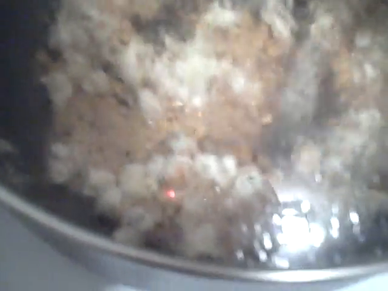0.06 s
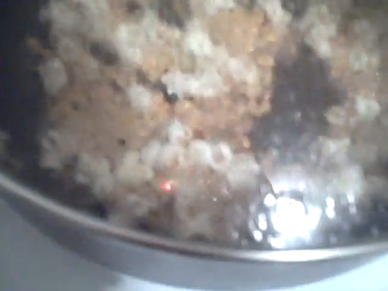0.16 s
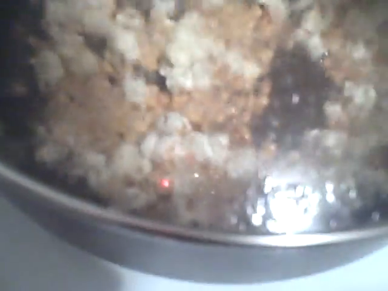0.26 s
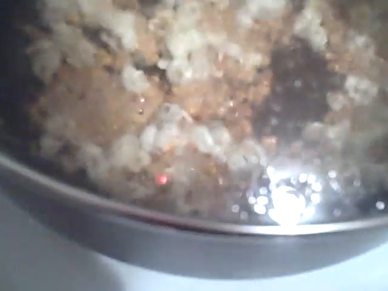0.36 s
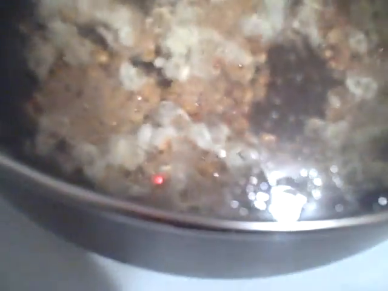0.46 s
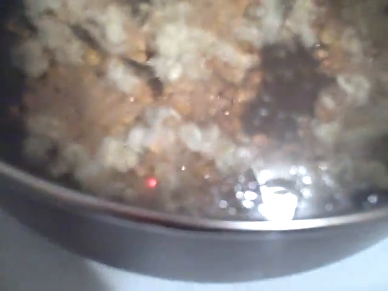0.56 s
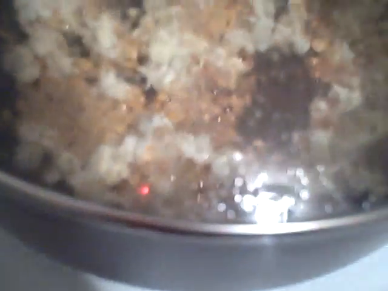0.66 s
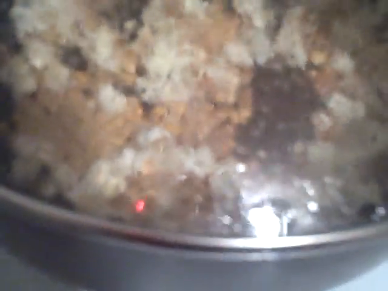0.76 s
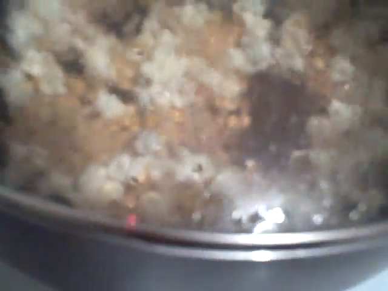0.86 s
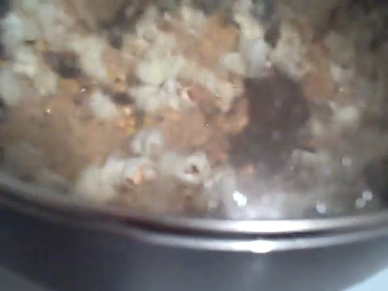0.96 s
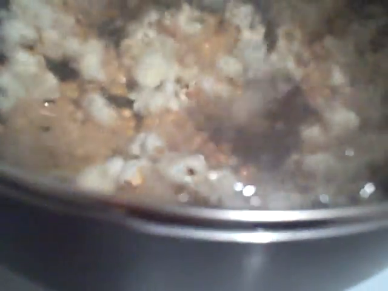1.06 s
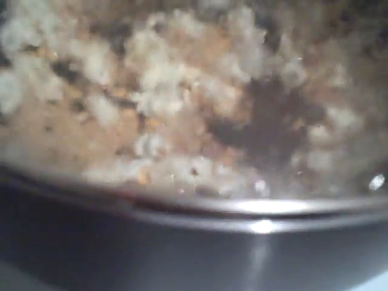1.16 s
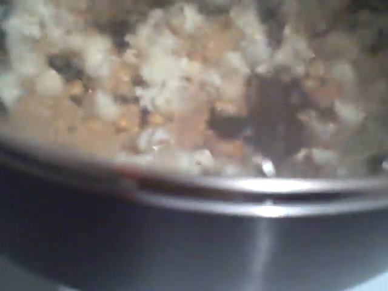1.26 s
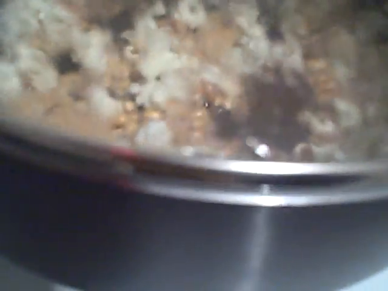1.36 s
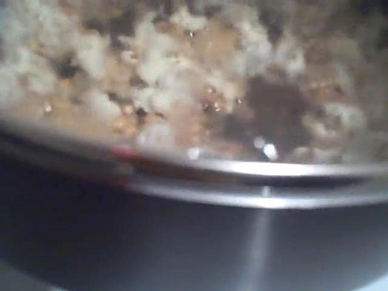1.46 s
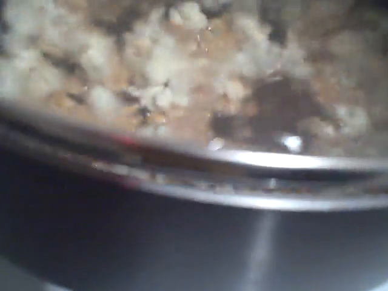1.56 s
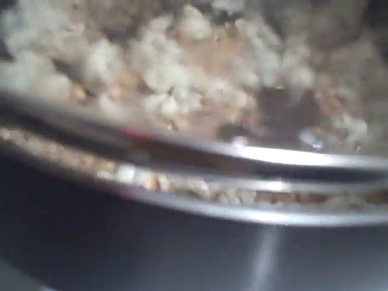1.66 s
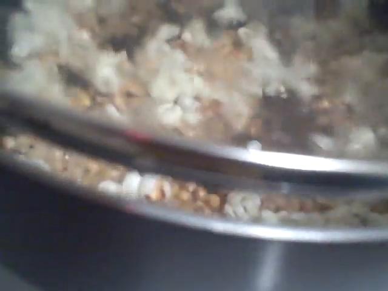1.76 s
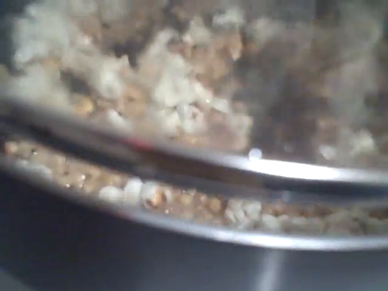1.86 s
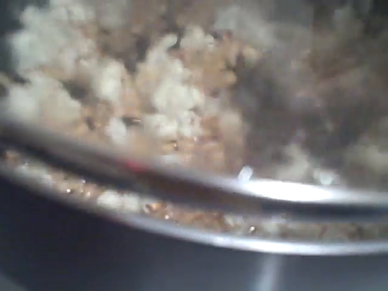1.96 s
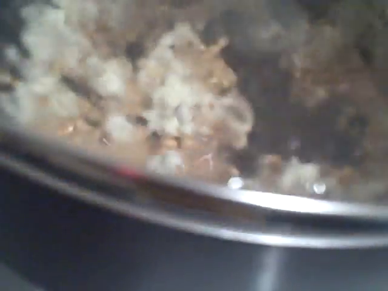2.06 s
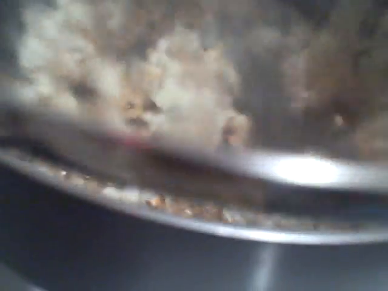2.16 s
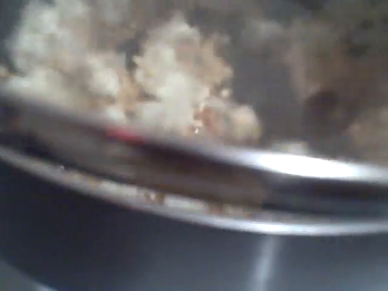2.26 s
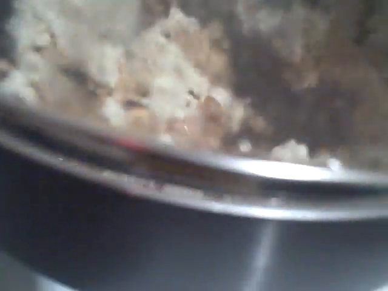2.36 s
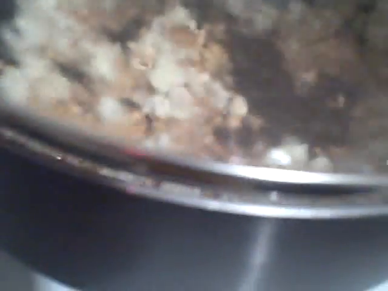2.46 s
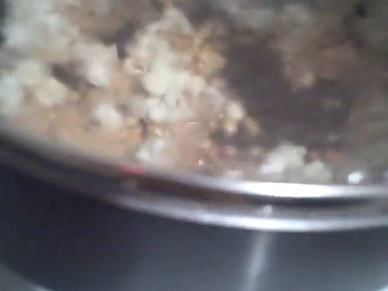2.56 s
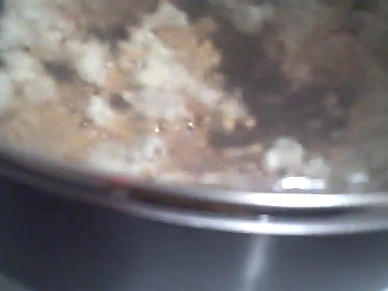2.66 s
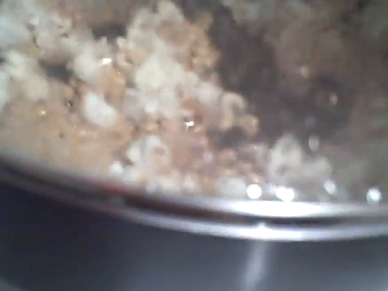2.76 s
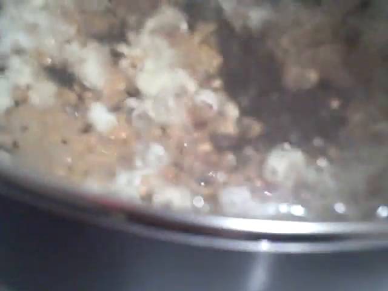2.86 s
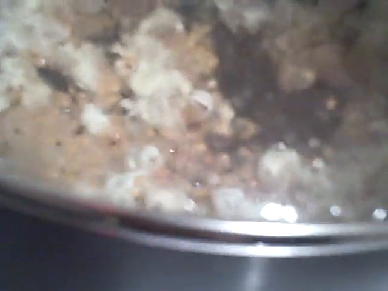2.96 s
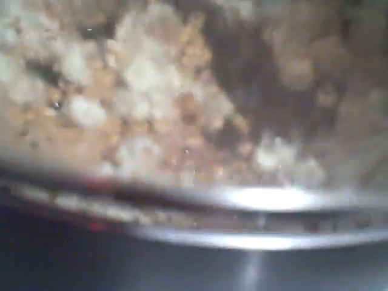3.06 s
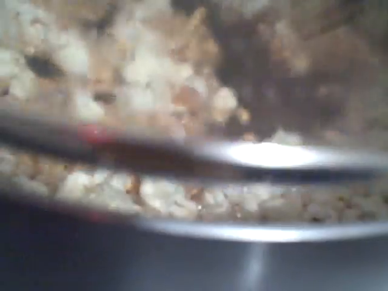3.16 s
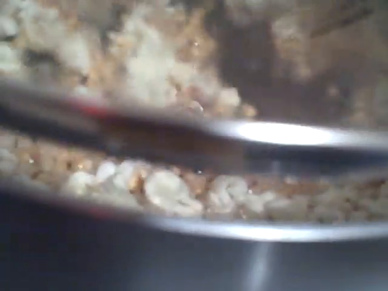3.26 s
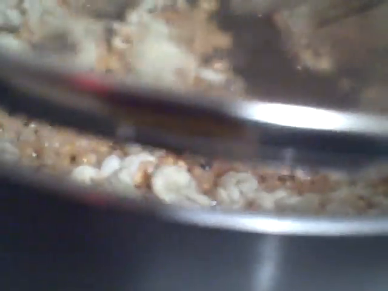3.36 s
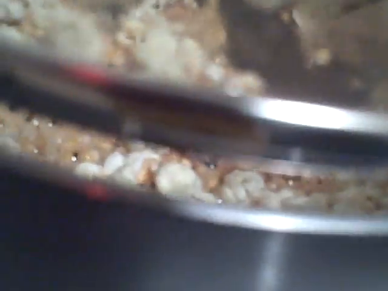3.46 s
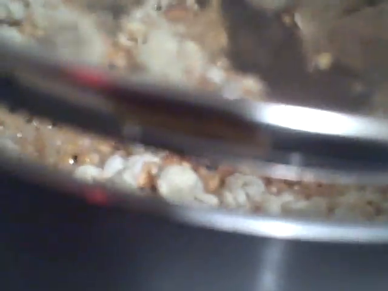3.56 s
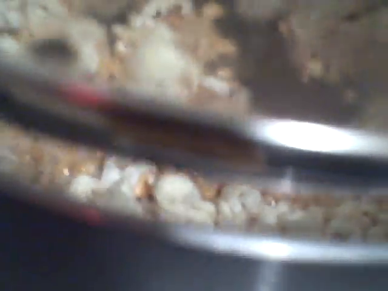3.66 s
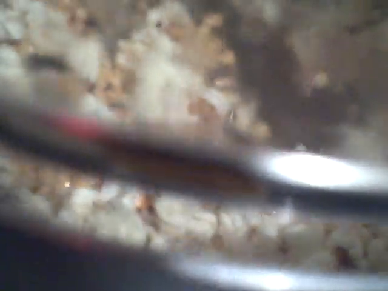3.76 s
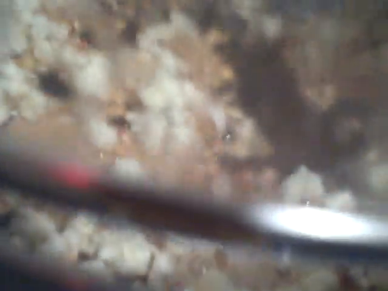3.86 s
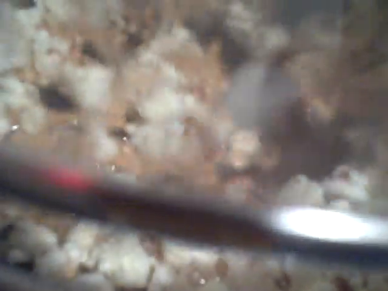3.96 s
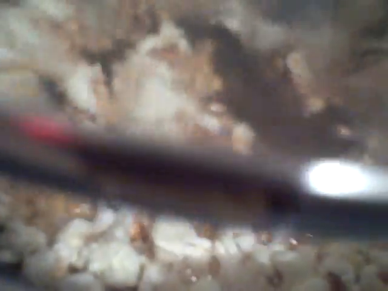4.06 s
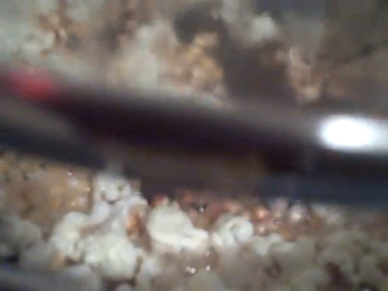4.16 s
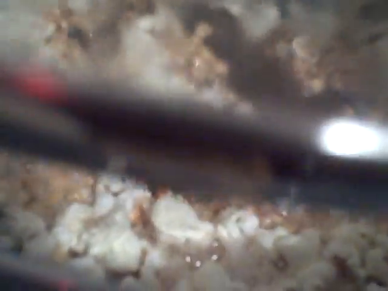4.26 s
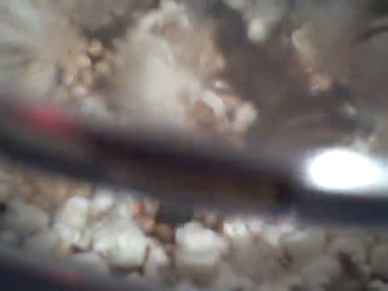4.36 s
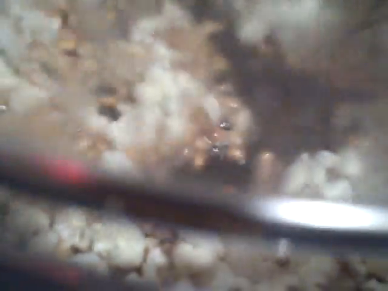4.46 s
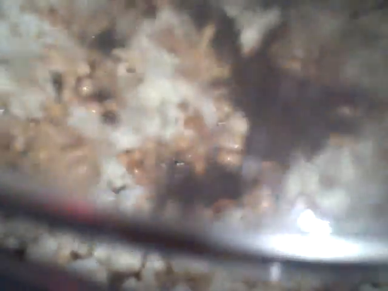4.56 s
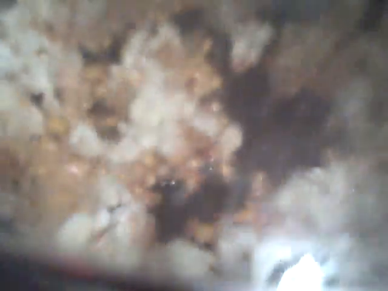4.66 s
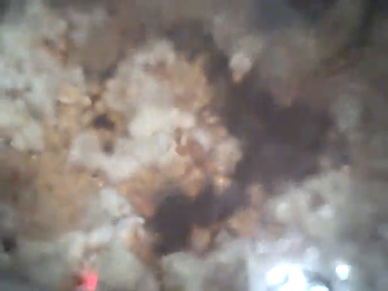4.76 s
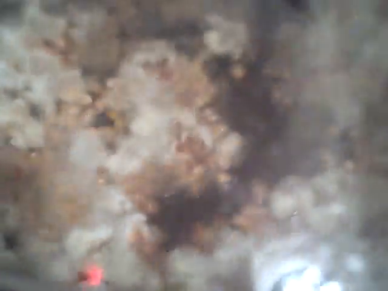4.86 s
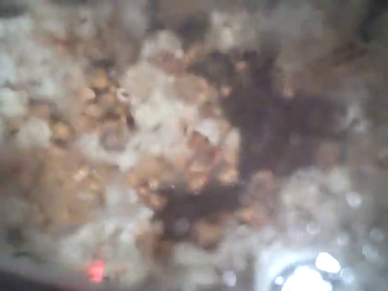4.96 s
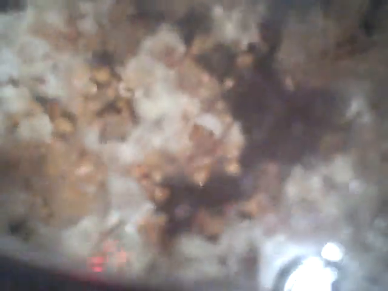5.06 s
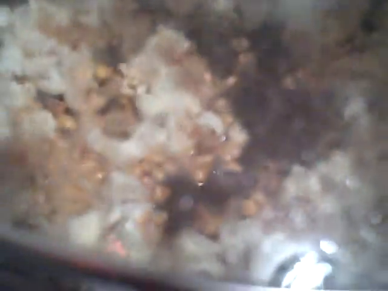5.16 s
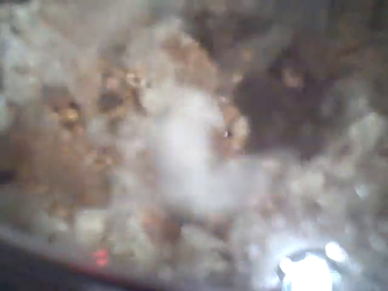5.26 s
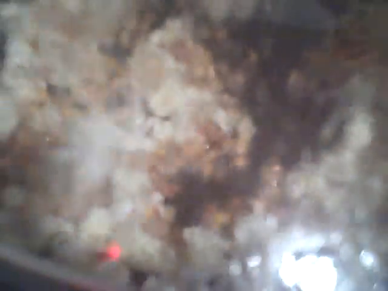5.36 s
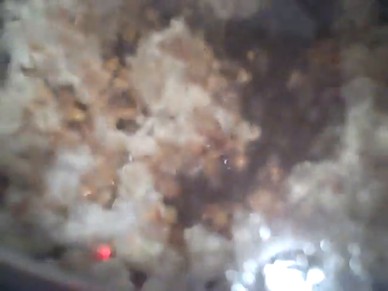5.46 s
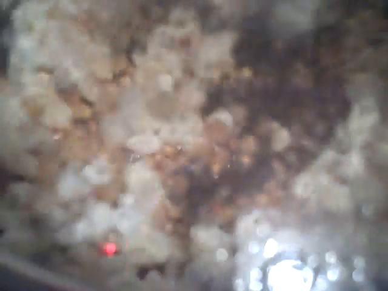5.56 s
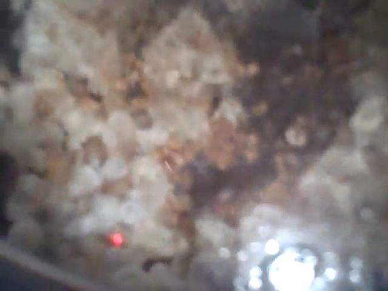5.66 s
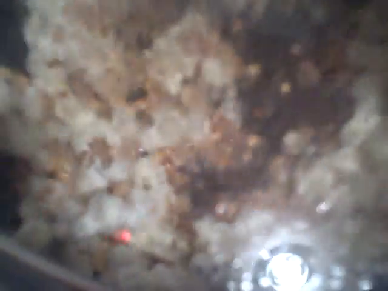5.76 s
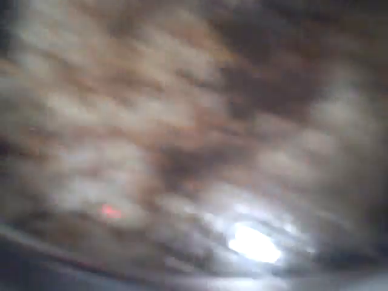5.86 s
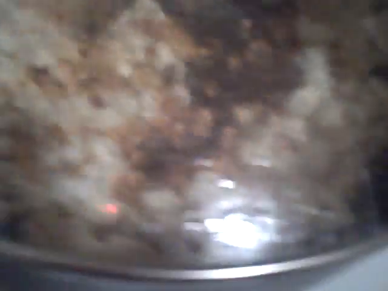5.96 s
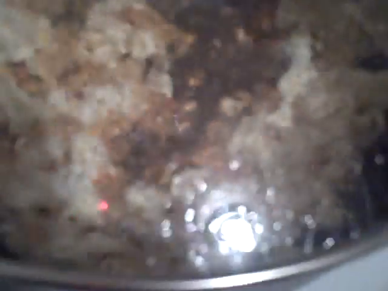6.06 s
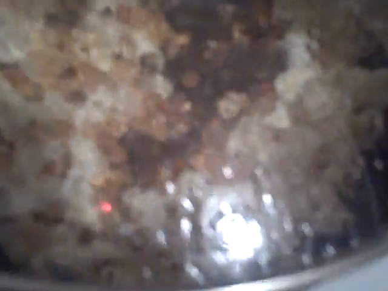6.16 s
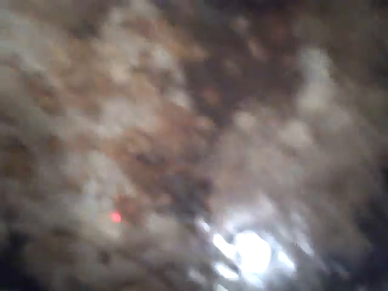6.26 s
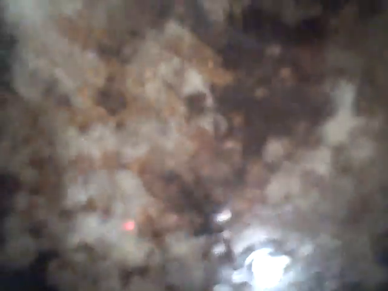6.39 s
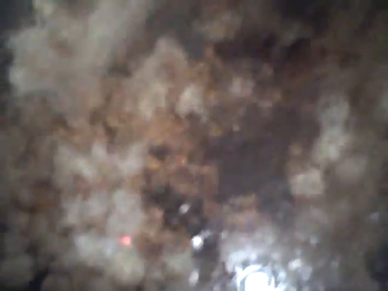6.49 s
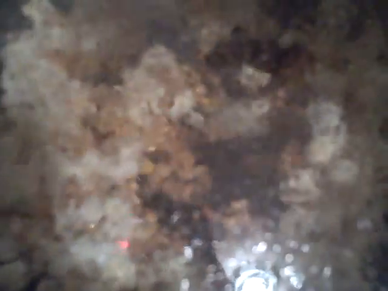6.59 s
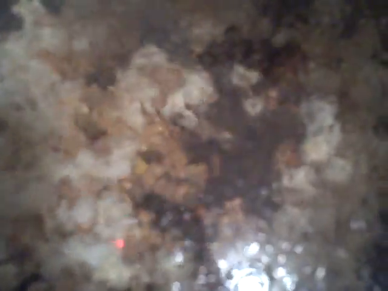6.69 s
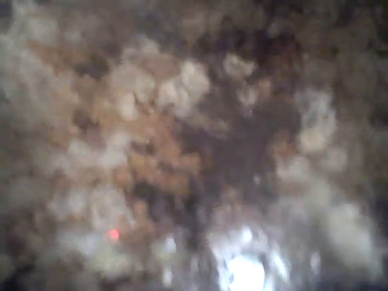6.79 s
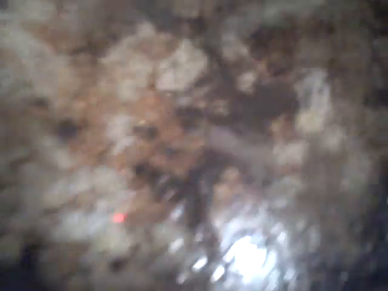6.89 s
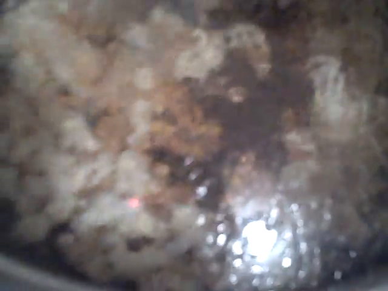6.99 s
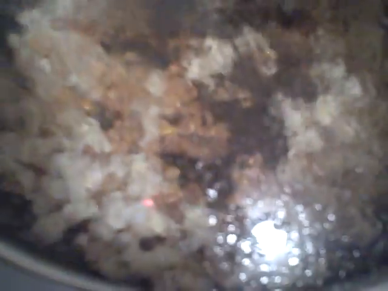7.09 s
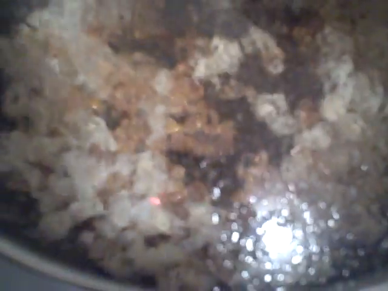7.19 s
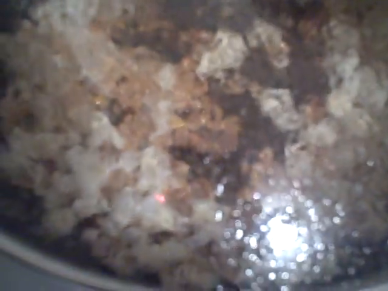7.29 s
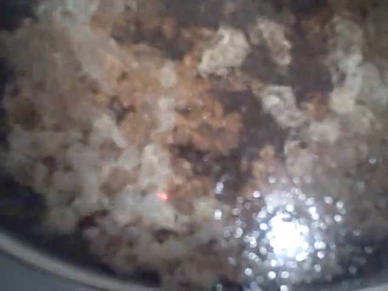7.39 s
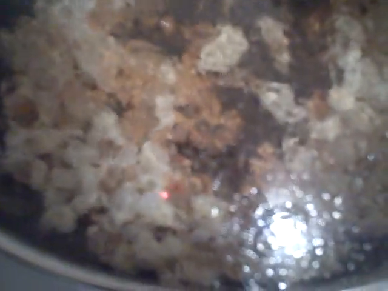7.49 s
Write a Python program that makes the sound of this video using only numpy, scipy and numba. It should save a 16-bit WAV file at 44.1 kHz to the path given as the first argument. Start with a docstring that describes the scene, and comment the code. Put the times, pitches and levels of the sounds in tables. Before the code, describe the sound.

A close microphone in a kitchen with faint hum and hiss. From 0 to 1 s, oil sizzles very quietly while kernels tick and knock, most clearly at 0.2 s. Pops start just after 1 s, crisp and metallic with a hollow thump; very loud ones strike around 1.9 and 2.3 s, leaving oil spitting. At 2.5-3 s the lid is moved: a hard clunk at 2.65, smaller knocks, low puffs of air. A lull of soft sizzle lasts until 3.7 s. Then an irregular flurry runs to 5.5 s, crowded near 4.5 and 5.4, its loudest cracks around 4.5 and 4.9 overloading slightly. From 5.5 to 5.85 s lid and pan clatter in quick knocks. A brief quiet follows, then at 6.55 s another sharp clatter and a burst of steam hiss, which flutters on with spitting oil and scattered glassy taps, notably around 7.1, until 7.5 s.

```python
"""Popcorn in a steel pan under a glass lid, close to a small camera microphone in a kitchen with a hum and short tail.
At first oil sizzles and kernels knock; from 1 s pops ring the pan's air and thump through the lid gap.
Around 2.5 s a hand moves the lid, puffing air; a second flurry runs from 3.7 to 5.5 s, the loudest pops clipping.
Then lid and kernels clatter on the rim, and from 6.5 s steam hisses; a wider gap gives thumps a higher pitch."""
import sys
import numpy as np
from scipy import signal
from scipy.fft import rfft, irfft
from scipy.io import wavfile
from scipy.ndimage import uniform_filter1d
from numba import njit

SR = 44100
rng = np.random.default_rng(int(sys.argv[2]) if len(sys.argv) > 2 else 0)


def log_audio(samples):
    """Write samples as a 16-bit WAV file to the path given in sys.argv[1]."""
    # one column per channel
    frames = np.atleast_2d(samples).T
    # limit to full scale, then quantise
    limited = np.clip(frames, -1, 1)
    pcm = np.round(limited * 32767).astype(np.int16)
    wavfile.write(sys.argv[1], SR, pcm)


N = 332071

# room hum and microphone hiss, relative colour: (frequency [Hz], density [dB per Hz])
HUM_COLOUR = [(12, -32.5), (20, 10), (252, -1.5), (505, -17), (1010, -32.5), (1200, -6), (1630, -22.5),
              (5230, -23.5), (6190, -23), (7950, -32.5), (15500, -33.5)]
HUM_DB = -56.5  # rms before its slow wavering
# oil heard through the gap, before splashes: (time [s], sizzle level [dB], spit level [dB])
OIL_LEVELS = [(0, -60.5, -70), (.27, -66, -62), (.55, -69, -65.5), (1.1, -65.5, -62), (1.76, -61, -62),
              (1.9, -52, -51.5), (2.45, -50, -45.5), (2.65, -58, -57), (2.85, -58.5, -65), (3.12, -67, -65),
              (3.3, -57.5, -54.5), (3.77, -57, -57.5), (4.3, -56, -50), (4.9, -59, -54), (5.47, -52, -45.5),
              (5.8, -65, -62.5), (6.46, -70, -67), (6.6, -43.5, -44), (6.8, -59.5, -55), (7.2, -57, -51),
              (7.53, -61, -52)]
# spitting droplets: (lowest [Hz], highest [Hz], rate [droplets per s], level in the spit [dB])
SPIT_BANDS = [(4700, 6000, 27, -6.5), (6260, 7200, 160, -6.5), (7000, 9700, 130, -6.5),
              (8500, 11000, 90, -8.5), (10300, 21000, 60, -11)]
# shakes of the pan that tumble the kernels: (time [s], level [dB], held [s])
PAN_SHAKES = [(.27, -52, 0.022), (1.22, -57, .05), (1.89, -54, .5), (2.53, -50, .03), (2.63, -41, .07),
              (2.85, -43, .07), (2.99, -43, .05), (5.05, -59, .02), (5.29, -41, .12), (5.54, -34, .03),
              (5.68, -33, .03), (6.03, -56, .03), (6.16, -54, .04), (6.57, -35.5, .07), (7.1, -51, .1)]
SHAKE_RISE_DB_PER_S, SHAKE_FALL_DB_PER_S, RESTING_DB = 700, 210, -69
TUMBLES_PER_S = 450
SCRAPE_DB = -3  # the pan's foot on the hob, relative to the rattle
# the lid gap as the neck of a bottle, higher when wider: (time [s], resonance [Hz])
GAP_PITCH = [(0, 248), (.9, 250), (1.05, 212), (1.55, 203), (1.85, 293), (2.1, 317.4), (2.2, 244),
             (2.33, 398), (2.5, 304.5), (2.6, 290), (2.64, 217.5), (2.83, 320), (2.92, 237.5), (3.1, 235),
             (3.3, 302.4), (3.8, 303), (4.33, 372), (5.27, 356), (5.54, 294.6), (5.63, 195), (6.4, 210.2),
             (6.56, 265), (7.53, 249.6)]
GAP_T60_S = 0.046
# the gap murmurs louder the wider it is
BREATH_DB, BREATH_DB_PER_HZ, CLOSED_HZ = -70, 0.0696, 240
# jerks of the lid that puff air through the gap: (time [s], level [dB], held [s])
LID_PUFFS = [(2.11, -46, .1), (2.25, -44, .04), (2.35, -43, .08), (2.53, -30, .045), (2.66, -38, .03),
             (2.84, -34, .06), (3.0, -45, .05), (3.36, -46, .02), (4.33, -43.5, .05), (5.1, -43, .03),
             (5.3, -40, .04), (5.47, -34, .05), (5.54, -29, .02), (6.17, -41, .04), (6.57, -52, .05)]
PUFF_RISE_DB_PER_S, PUFF_FALL_DB_PER_S = 1100, 300
# steam under the closed lid: (time [s], level of the hiss before flutter [dB])
STEAM_LEVELS = [(0, -75), (.9, -71), (6.45, -75), (6.55, -51), (6.85, -59), (7.05, -58), (7.2, -50),
                (7.32, -55), (7.4, -51), (7.53, -55)]
# blows after which one mode of lid or wall sings on: (time [s], frequency [Hz], starting peak [dB], t60 [s])
SINGING_MODES = [(.02, 2050, -60, 0.69), (.28, 4870, -47, 0.19), (1.057, 1108, -34.5, 0.17),
                 (4.311, 1210, -47, 0.23), (1.974, 1360, -32.5, 0.25), (2.243, 4870, -18.5, 0.03),
                 (2.644, 1113, -16.5, 0.1), (2.644, 1956, -32, 0.18), (2.918, 1402, -36.5, 0.22),
                 (4.919, 807, -41, 0.53), (4.946, 4770, -25, 0.1), (5.046, 796, -40, 0.42),
                 (5.31, 812, -40, .3), (5.31, 1394, -38, .25), (5.40, 1140, -24, .12), (2.66, 812, -40, .5),
                 (5.046, 1391, -32.5, 0.36), (5.046, 1985, -22.5, 0.053), (5.289, 4660, -31, 0.042),
                 (5.459, 1256, -30.5, 0.2), (5.528, 1410, -36, 0.37), (5.749, 3266, -44, 0.13),
                 (5.749, 3970, -21.5, 0.046)]
# glass lid on the steel rim: (frequency [Hz], weight before scatter [dB], t60 [s])
LID_MODES = [(1100, -4, .035), (1394, -8, .05), (1700, -6, .025), (2060, -5, .03), (2400, -4, .025),
             (2780, -6, .025), (3250, -3, .025), (3900, -3, .03), (4780, -3, .03), (5240, -2, .025),
             (5750, -3, .025), (6800, -8, .025), (7950, -10, .025)]
# lid, rim and loose kernels knocking, rms of the first 10 ms:
# (time [s], ring level [dB], gap thump level [dB], brightness [dB], burst t60 [s])
KNOCKS = [(.0555, -54.5, -66, -1, .04), (.1017, -56, -61, 7, .031), (.2084, -31, -48, 9.5, 0.06),
          (.2571, -43, -51, -18, .06), (.2685, -41.5, -49, -14, 0.029), (.2806, -34.5, -58, 12.5, 0.028),
          (.3717, -54, -65, -14, 0.03), (.421, -54.5, -69, 0, .032), (.6335, -53.5, -65, 20, 0.05),
          (.77, -52, -59, 0, .09), (.7868, -53, -45, 1, .09), (2.5221, -42.5, -44, -6, 0.11),
          (2.644, -19.5, -15.5, 1.5, 0.02), (2.6579, -24, -33, -8, 0.086),
          (2.8316, -26.5, -21, -1.5, 0.033), (2.8545, -42, -32, 5, 0.043), (2.8899, -46, -38, -1, .04),
          (2.9181, -41.5, -33.5, -7, 0.035), (2.9349, -44.5, -40, -18, .054), (3.0001, -37, -37, 1, .042),
          (3.0152, -42.5, -32, -12, .05), (3.0327, -47, -39, -17, .044), (5.5288, -23, -26.5, -17, 0.033),
          (5.5805, -46, -49, 10, .035), (5.6339, -29.5, -26.5, -2, 0.06), (5.669, -23, -26.5, -21, 0.027),
          (5.6831, -28.5, -39, -8, 0.06), (5.6991, -39, -34, -16, .035), (5.715, -44, -40, 0, .04),
          (5.7488, -28, -40, 2, 0.026), (5.8042, -51, -58, 14, .047), (5.8387, -47, -59, 18, .035),
          (6.0204, -50.5, -39.5, -4, 0.082), (6.1499, -37.5, -34.5, -5.5, 0.065),
          (6.4072, -39, -65, 6.5, .041), (6.4274, -43.5, -60, -4, .11), (6.4623, -44, -65, -9.5, 0.065),
          (6.5124, -58, -65, 18, .035), (6.5613, -24, -38, 7, 0.057), (6.5794, -36, -43, -8, 0.043),
          (6.595, -37, -36, -14, .049), (6.6116, -39, -30, -17, .028), (6.6237, -17, -44, -3, .02),
          (6.7534, -43.5, -53.5, 10, 0.057), (6.804, -52, -67, 25, .026), (6.8877, -40, -55, 8, .054),
          (6.9321, -43, -47.5, 11, 0.09), (6.9701, -39, -64, -0.5, 0.025), (7.0116, -52, -59, 19, .035),
          (7.0879, -29, -46, 2, .097), (7.1411, -26, -45, 10, 0.022), (7.155, -34, -53, -9, 0.056),
          (7.1861, -41, -56, 0, .049), (7.3708, -45, -68, 12, 0.043)]
# every blow: low ring and crack lie under the ring and tilt apart with the brightness
LOW_RING_DB, CRACK_DB = -3.5, -4
BLOW_SAMPLES, RING_SAMPLES = 7000, 2600
# air in the pan: (frequency [Hz], weight before scatter [dB], t60 [s])
PAN_MODES = [(1135, -5, .05), (1800, -1, .055), (2165, -2, .05), (2240, -6, .035), (2430, -10, .03),
             (2630, -8, .03), (2895, -1, .033), (3200, -6, .022), (3450, -3, .025), (3700, -6, .025),
             (4190, -3, .025), (4400, -3, .025), (4825, -2, .03), (5310, -4, .025), (5700, -4, .025),
             (6430, -9, .025), (7300, -11, .025), (7950, -11, .025)]
# faint kernels ticking at random times
TICKS_PER_S, TICK_DB, TICK_SCATTER_DB, TICK_BURST_S = 2.5, -56, 2.5, .035
# kernels bursting and striking inside the pan, rms of the first 10 ms:
# (time [s], ring level [dB], gap thump level [dB], brightness [dB], burst t60 [s])
KERNEL_POPS = [(1.047, -41, -33, 0, 0.054), (1.0568, -25, -32.5, 2, 0.029), (1.114, -51, -61, 0, .04),
               (1.2086, -23.5, -28, -0.5, 0.082), (1.27, -47, -51, 4, .04), (1.3707, -55, -65, -19, .05),
               (1.3982, -35.5, -44.5, 1.5, 0.057), (1.5313, -70, -41, -9, .035),
               (1.8526, -12.5, -21.5, 2.5, 0.049), (1.8636, -35.5, -37, 8, .03),
               (1.9003, -37, -50, 10, .03), (1.9341, -8.5, -10.5, 5, 0.048), (1.9743, -27.5, -42, -7, .04),
               (2.0395, -43, -53, -11, .035), (2.085, -47, -54, 17, .03), (2.0996, -20, -10, 0.5, 0.033),
               (2.1426, -23.5, -30.5, 5.5, .065), (2.2163, -34.5, -27.5, -1, 0.063),
               (2.2429, -30, -26, -1, 0.027), (2.3034, -43, -51, 4.5, .035),
               (2.3352, -6.5, -23.5, 7, 0.036), (2.3402, -27, -40.5, 15.5, .026),
               (2.3713, -36, -54.5, -3.5, 0.032), (2.4658, -44, -34.5, -1, .035),
               (3.2852, -49.5, -70, 10, .035), (3.4215, -51.5, -70, 13, .035), (3.7301, -45, -58, 8, 0.025),
               (3.8004, -24.5, -31.5, -3.5, 0.039), (3.831, -35, -38, -4, 0.032),
               (3.8763, -43.5, -45.5, -10, 0.031), (3.9804, -23, -30, 6, .016),
               (4.087, -11, -24.5, -6, 0.019), (4.2112, -44.5, -50, 18.5, 0.019),
               (4.31, -51, -47, -12, .05), (4.3407, -29, -39, 2.5, .035), (4.3494, -22, -28.5, -9, 0.031),
               (4.3997, -20.5, -27.5, 4.5, 0.023), (4.4225, -19, -39, 2, 0.022),
               (4.4539, -48, -50.5, -9, .035), (4.4785, -12.5, -5.5, -2, .02), (4.5, -37, -34.5, 4, .031),
               (4.5158, -45, -34, -1, .038), (4.5522, -16, -12, 0, .042), (4.5595, -21, -34, 20, .06),
               (4.5779, -24, -37, -10, 0.032), (4.704, -52, -55, 16, .035), (4.713, -49, -58, 23.5, 0.032),
               (4.733, -51, -61, 25.5, .035), (4.815, -55, -70, 23, .04), (4.9059, -15, -9, 6, 0.029),
               (4.9195, -8.5, -28.5, 4, .036), (4.9462, -27, -41.5, 10, 0.022),
               (5.0337, -31, -49, -14, .03), (5.0454, -25, -55, -12, 0.034),
               (5.0734, -17.5, -21, -8, 0.044), (5.1193, -33, -36.5, 6, .015),
               (5.158, -48.5, -37, -2, .035), (5.252, -52, -58, 11, .03), (5.2692, -20.5, -16, 0, 0.044),
               (5.3095, -27, -31.5, -13, 0.013), (5.3511, -14.5, -15.5, 2, 0.024),
               (5.386, -26.5, -35, -3, .056), (5.4009, -25, -22, 0, .022), (5.4062, -16.5, -50, -2, 0.04),
               (5.4168, -26.5, -47, 15, 0.028), (5.437, -22, -38, 6.5, .017), (5.4787, -28.5, -56, 14, .04)]
# each pop splashes oil, which sizzles up and dies away; level relative to the pop's ring
SPLASH_DB, SPLASH_T60_S = -34, .45
ROOM_T60_S, ROOM_TREBLE_T60_S, ROOM_DB = 0.34, 0.21, -20.5
TOP_HZ = 15650  # upper limit of the recorder


def undb(db):
    """Decibels to gain."""
    return 10 ** (np.asarray(db) / 20)


def level(x, db):
    """Scale to an rms level."""
    return x * undb(db) / np.sqrt(np.mean(x ** 2))


def unit(x, span=SR // 100):
    """Scale each row to unit rms over its first samples, 10 ms by default."""
    return x / np.std(x[:, :span], axis=1, keepdims=True)


def fade(t, t60):
    """Exponential decay by 60 dB in t60."""
    return np.exp(-np.log(1000) * t / t60)


def band(x, lo_hz, hi_hz):
    """Fixed band-pass."""
    return signal.sosfilt(signal.butter(2, [lo_hz, hi_hz], "band", fs=SR, output="sos"), x)


@njit
def moving_band(x, hz, width):
    """State-variable band-pass whose centre moves, gain 1 at the centre."""
    y, b, l = np.empty(len(x)), 0., 0.
    for i in range(len(x)):
        g, k = np.tan(np.pi * hz[i] / SR), width / hz[i]
        v = (b + g * (x[i] - l)) / (1 + g * (g + k))
        b, l, y[i] = 2 * v - b, l + 2 * g * v, k * v
    return y


def curve(table):
    """The columns of a table, one value a sample."""
    s, *columns = np.transpose(table)
    return [np.interp(np.arange(N) / SR, s, c) for c in columns]


def walk(rate):
    """Random levels held 1 / rate s and slewed twice; spread near 1."""
    k = int(SR / rate)
    steps = np.repeat(rng.standard_normal(N // k + 1), k)
    return 1.3 * uniform_filter1d(uniform_filter1d(steps, k), k)[:N]


def bumps(rows, rise_db, fall_db, rest_db):
    """Level in dB: each row rises from rest, holds and falls back."""
    t = np.arange(N) / SR
    coarse = t[::64]
    s, db, held = np.transpose(rows)[:, :, None]
    rise = rise_db * np.maximum(s - coarse, 0)
    fall = fall_db * np.maximum(coarse - s - held, 0)
    return np.maximum(np.interp(t, coarse, (db - rise - fall).max(axis=0)), rest_db)


def grains():
    """Noise of dense tiny bursts with a long tail of loud ones."""
    return rng.standard_normal(N) * undb(1.7 * rng.exponential(size=N))


def kitchen():
    """Coloured noise gives a slowly wavering room hum and microphone hiss."""
    hz = np.fft.rfftfreq(N, 1 / SR)
    colour_hz, colour_db = np.array(HUM_COLOUR).T
    colour = np.interp(np.log(hz + 1), np.log(colour_hz), colour_db)
    hum = irfft(rfft(rng.standard_normal(N)) * undb(colour), N)
    return level(hum, HUM_DB) * undb(0.81 * walk(5.6))


def sizzle():
    """Dense tiny bursts of oil colour the pan's air and swell with each splash."""
    oil = grains()
    air = sum(undb(.4 * db) * band(oil, hz - 45, hz + 45) for hz, db, _ in PAN_MODES)
    oil = level(air, -2) + level(band(oil, 1300, 6000), -4)
    oil = oil * undb(1.5 * walk(30))
    oil_db = curve(OIL_LEVELS)[0]
    return oil * np.sqrt(undb(2 * oil_db) + splash())


def spitting():
    """Droplets tick as short bursts in high bands over a bed of fine spatter."""
    bed, droplets = grains(), grains()
    spit = level(band(bed, 3400, 7400), -4.0) + level(band(bed, 9000, 21000), -2.1)
    for lo_hz, hi_hz, rate, db in SPIT_BANDS:
        drops = (rng.random(N) < rate / SR) * undb(2.5 * rng.exponential(size=N))
        drops = signal.fftconvolve(drops, fade(np.arange(SR // 20) / SR, 0.016))[:N]
        spit = spit + level(band(droplets * drops, lo_hz, hi_hz), db)
    spit_db = curve(OIL_LEVELS)[1]
    return level(spit, 0) * np.sqrt(undb(2 * spit_db) + 0.73 * splash())


def rattle():
    """Tumbling kernels knock out a few narrow ringing lines, over the scrape of the pan's foot."""
    tumbles = (rng.random(N) < TUMBLES_PER_S / SR) * undb(1.5 * rng.exponential(size=N))
    knocks = grains() * (.12 + tumbles)
    kernels = level(band(knocks, 350, 1300), -4) + level(band(knocks, 1800, 4500), -12)
    for hz in (570, 812, 1120, 1394, 1951):
        kernels = kernels + level(band(knocks, hz - 16, hz + 16), -11)
    kernels = kernels * undb(2.5 * walk(60))
    scrape = level(band(grains(), 30, 170), SCRAPE_DB)
    shake_db = bumps(PAN_SHAKES, SHAKE_RISE_DB_PER_S, SHAKE_FALL_DB_PER_S, RESTING_DB)
    return (level(kernels, 0) + scrape) * undb(shake_db)


def breath(gap_hz):
    """Moving the lid pumps air through the gap: noise rings at its moving resonance."""
    murmur_db = BREATH_DB + BREATH_DB_PER_HZ * (gap_hz - CLOSED_HZ)
    breath_db = bumps(LID_PUFFS, PUFF_RISE_DB_PER_S, PUFF_FALL_DB_PER_S, murmur_db)
    air = moving_band(moving_band(rng.standard_normal(N), gap_hz, 50.), gap_hz, 90.)
    return level(air, 0) * undb(breath_db)


def steam():
    """A fluttering hiss coloured by the lid's high resonances."""
    noise, hiss = rng.standard_normal(N), np.zeros(N)
    # (lowest [Hz], highest [Hz], level [dB])
    for lo_hz, hi_hz, db in [(4700, 5800, -7), (6400, 7000, -7), (7300, 8900, 0)]:
        hiss = hiss + level(band(noise, lo_hz, hi_hz), db) * undb(3 * walk(45))
    return undb(curve(STEAM_LEVELS)[0]) * hiss


def pings():
    """Single modes of lid or wall fade as decaying sines."""
    out, t = np.zeros(N + SR), np.arange(SR) / SR
    for s, hz, db, t60 in SINGING_MODES:
        start = int(s * SR)
        out[start:start + SR] += undb(db) * fade(t, t60) * np.sin(2 * np.pi * hz * t)
    return out[:N]


def hits(events, modes, gap_hz, broad_db, treble_db, knock_db, rumble_db):
    """Each blow: a ragged burst rings the modes, with a treble crack, a dull knock, a thump of the gap and a rumble."""
    out, t = np.zeros(N + BLOW_SAMPLES), np.arange(BLOW_SAMPLES) / SR
    hz, db, t60 = np.transpose(modes)[:, :, None]
    s, ring_db, thump_db, bright_db, burst_s = np.transpose(events)[:, :, None]
    start, burst_s = (s[:, 0] * SR).astype(int), np.clip(burst_s, .004, .15)
    noise = rng.standard_normal((4, len(s), BLOW_SAMPLES))
    place = rng.standard_normal((len(s), 2, len(modes), 1))

    # a sharp snap of the shell, then the puff of steam
    snap = fade(t, burst_s) + 1.2 * fade(t, 0.003)
    burst = snap * noise[0]

    # every blow lands elsewhere, so the modes get new weights and slightly new pitches
    weight, short = undb(db + 3.5 * place[:, 0]), t[:RING_SAMPLES]
    mode_hz = hz * (1 + .006 * place[:, 1])
    shape = np.sum(weight * fade(short, t60) * np.sin(2 * np.pi * mode_hz * short), axis=1)
    ring = unit(signal.fftconvolve(burst, shape, axes=1)[:, :BLOW_SAMPLES])
    ring = ring + undb(broad_db) * unit(burst)
    ring = ring - .6 * band(ring, 1250, 1700)  # the pan is dull between its lowest modes
    low_ring = band(band(ring, 1050, 2600), 1000, 2700)

    treble = band(unit(snap * noise[1]), 6300, 15800)
    crack = band(ring, 4700, 7000) + undb(treble_db) * treble
    gap_tone = np.sin(-2 * np.pi * gap_hz[start, None] * t)
    thump = fade(t, GAP_T60_S) * (1 - np.exp(-t / 0.0011)) * gap_tone
    thump = thump + band(noise[1] * fade(t, .1), 210, 320)
    knock = band(noise[2] * fade(t, 1.2 * burst_s), 400, 880)
    rumble = band(noise[3] * fade(t, .08), 95, 190)

    # the rumble follows the thump, the knock lies between thump and low ring
    low_db = ring_db + LOW_RING_DB - bright_db / 2
    blows = unit(rumble, SR // 50) * undb(thump_db + rumble_db)
    blows = blows + unit(thump) * undb(thump_db)
    blows = blows + unit(knock) * undb((thump_db + low_db) / 2 + knock_db)
    blows = blows + unit(low_ring) * undb(low_db)
    blows = blows + unit(band(ring, 2500, 5200)) * undb(ring_db)
    blows = blows + unit(crack) * undb(ring_db + CRACK_DB + bright_db / 2)
    for i, blow in zip(start, blows):
        out[i:i + BLOW_SAMPLES] += blow
    return out[:N]


def clatter(gap_hz):
    """Lid and loose kernels knock on the rim and ring the lid's modes."""
    return hits(KNOCKS, LID_MODES, gap_hz, broad_db=8, treble_db=-5, knock_db=-.8, rumble_db=-10)


def ticks(gap_hz):
    """Faint kernels strike at random and ring the air in the pan."""
    when, size, bright = rng.random((int(TICKS_PER_S * N / SR), 3)).T
    db = TICK_DB + TICK_SCATTER_DB * 2 * (size - .5)
    events = np.transpose([when * N / SR, db, db - 9, 25 * bright - 5, TICK_BURST_S + 0 * db])
    return hits(events, PAN_MODES, gap_hz, broad_db=3, treble_db=-3, knock_db=-9, rumble_db=-9)


def pops(gap_hz):
    """Bursting kernels ring the air in the pan and thump through the lid gap."""
    return hits(KERNEL_POPS, PAN_MODES, gap_hz, broad_db=2.5, treble_db=-7, knock_db=-17, rumble_db=-22)


def splash():
    """Power of the oil that the pops throw up, fading after each pop."""
    kick, t = np.zeros(N), np.arange(SR) / SR
    s, ring_db = np.array(KERNEL_POPS)[:, :2].T
    np.add.at(kick, (s * SR).astype(int), undb(ring_db + SPLASH_DB) ** 2)
    return np.abs(signal.fftconvolve(kick, fade(t, SPLASH_T60_S) ** 2)[:N])


def room(x):
    """Walls and hob answer with a dense tail that dulls as it fades."""
    t = np.arange(SR // 2) / SR
    noise = rng.standard_normal((2, len(t)))
    tail = band(noise[0], 140, 3000) * fade(t, ROOM_T60_S)
    tail = tail + band(noise[1], 3000, 13000) * fade(t, ROOM_TREBLE_T60_S)
    tail = tail * (1 - np.exp(-t / 0.0031))
    return undb(ROOM_DB) * signal.fftconvolve(x, tail / np.sqrt(np.sum(tail ** 2)))[:N]


def scene():
    """Pops and clatter with their room tail, over sizzle, the breathing gap and the kitchen."""
    gap_hz, = curve(GAP_PITCH)
    background = kitchen() + sizzle() + spitting() + rattle() + breath(gap_hz) + steam()
    blows = pings() + clatter(gap_hz) + ticks(gap_hz) + pops(gap_hz)
    return (background + blows + room(blows))[None]


def record(dry):
    """The recorder clips at full scale and cuts the top."""
    return signal.sosfilt(signal.ellip(8, .2, 60, TOP_HZ, fs=SR, output="sos"), np.clip(dry, -1, 1))


dry = scene()
out = record(dry)
log_audio(out)
```